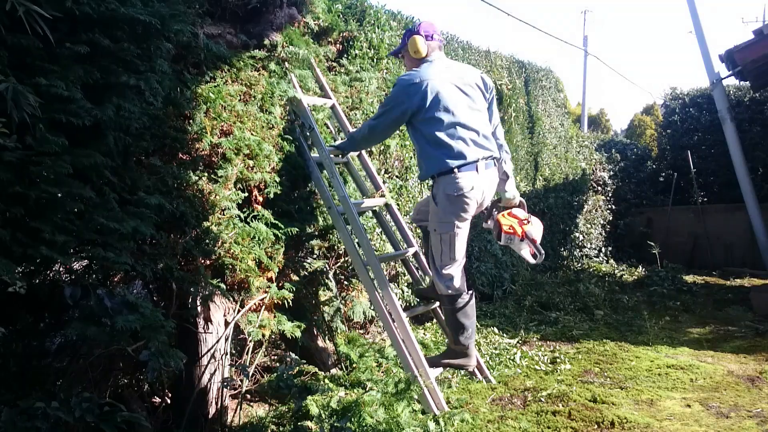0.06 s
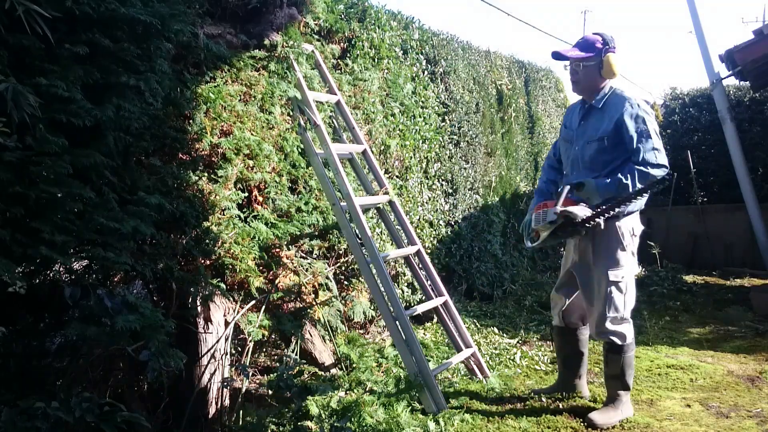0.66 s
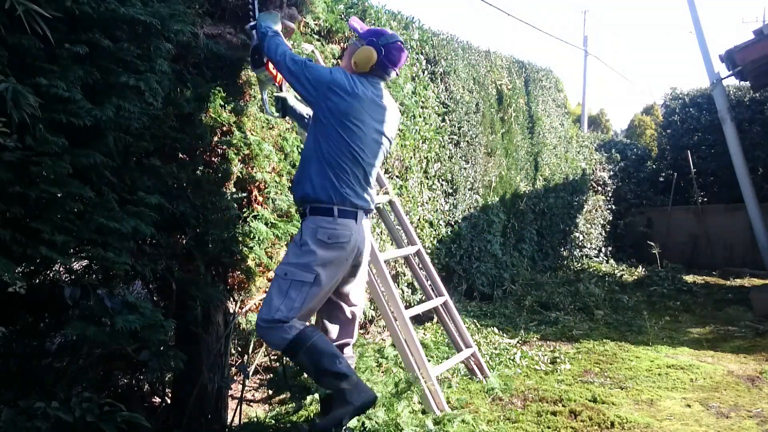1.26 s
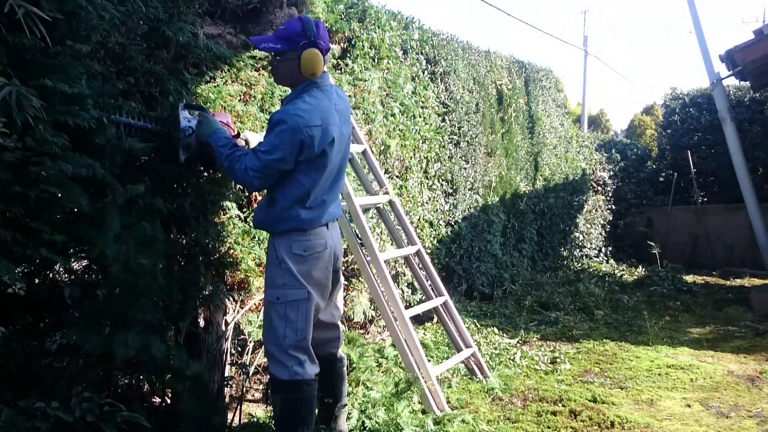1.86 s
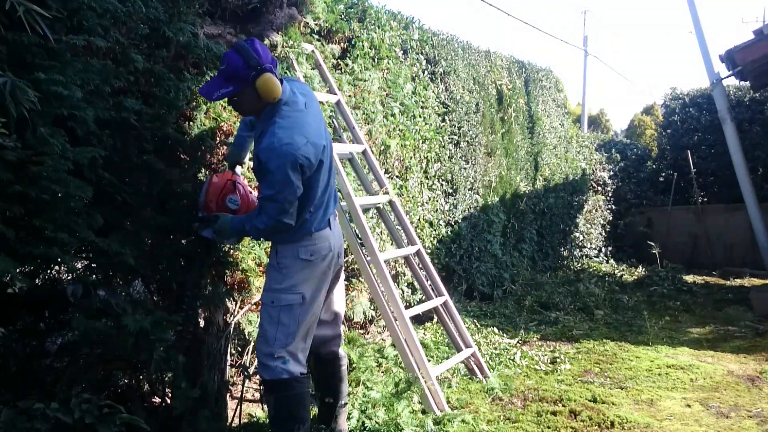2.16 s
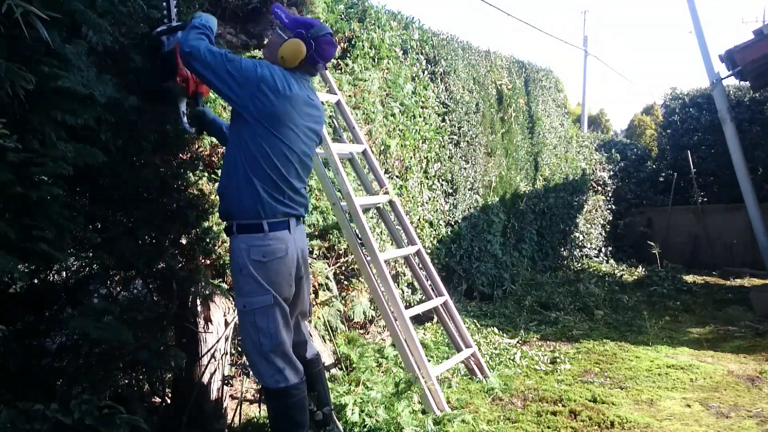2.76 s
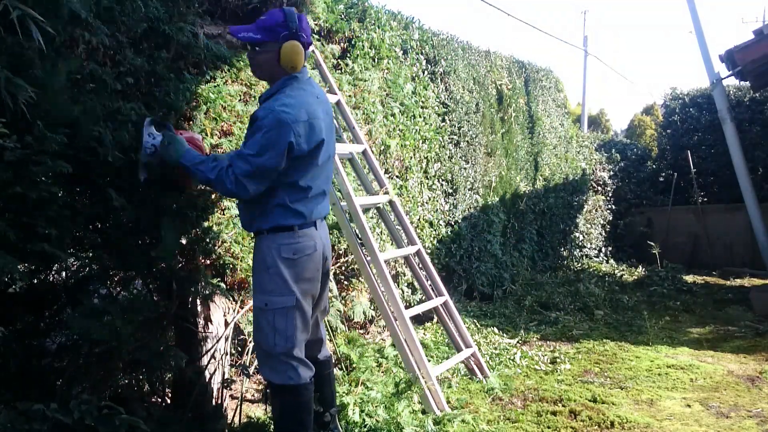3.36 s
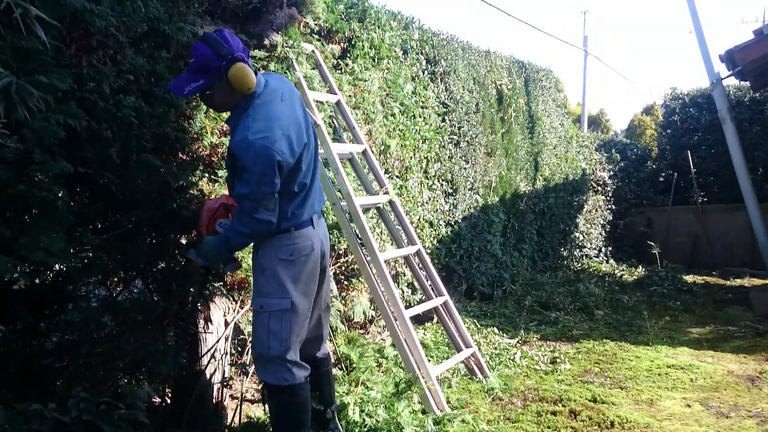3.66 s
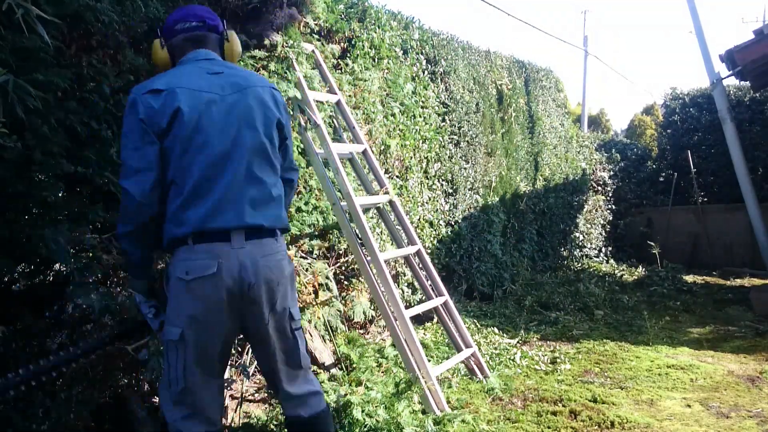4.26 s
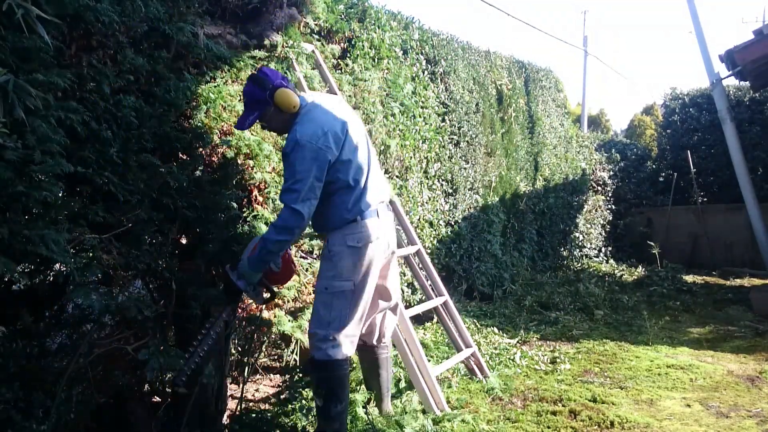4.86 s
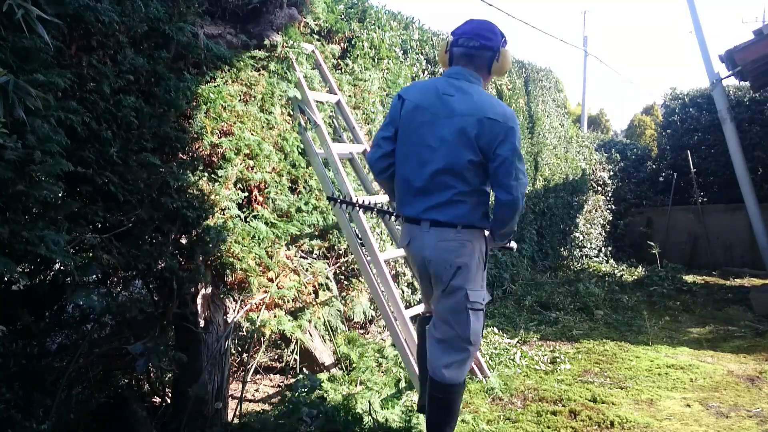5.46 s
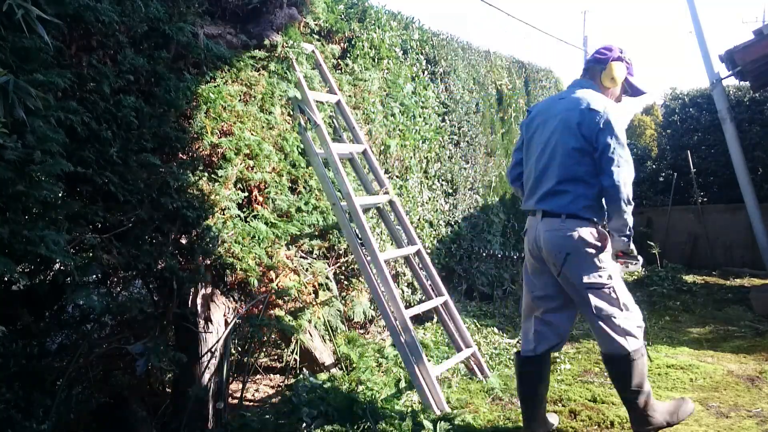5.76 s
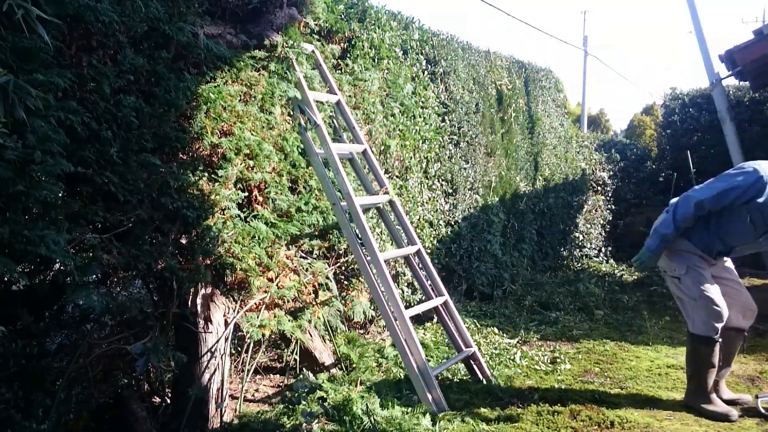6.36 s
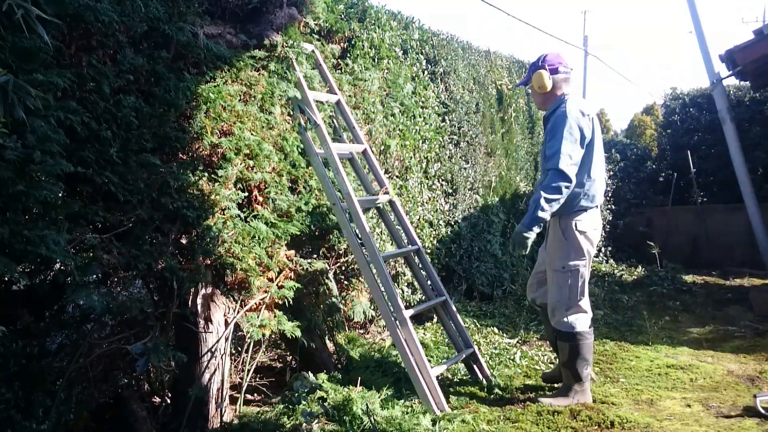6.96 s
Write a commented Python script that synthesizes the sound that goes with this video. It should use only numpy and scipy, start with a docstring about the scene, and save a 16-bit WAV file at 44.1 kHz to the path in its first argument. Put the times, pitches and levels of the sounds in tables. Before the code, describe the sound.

A two-stroke hedge trimmer idles outdoors with a buzzing whine and ticking blades. After a quick blip it revs to full speed for about three seconds, blades hissing and rasping along a hedge. It falls to a lower, clacking idle, revs once more briefly, then idles again, the exhaust puttering more strongly as it is set down. The sound is fairly near, wide and slightly hollow.

```python
"""Two-stroke hedge trimmer

The engine idles, is blipped, revs twice to cut a conifer hedge, and is set down on the lawn.
Its fan whines at three times the firing rate, the blades hiss by friction and rattle by impact,
and exhaust pulses ring the silencer. Two closely spaced microphones of opposite polarity
make the sound wide and hollow."""
import sys
import numpy as np
from scipy import signal
from scipy.fft import rfft, irfft
from scipy.io import wavfile
from scipy.ndimage import map_coordinates

SR = 44100
rng = np.random.default_rng(int(sys.argv[2]) if len(sys.argv) > 2 else 0)


def output_pcm(signal):
    """Save a mono or channel-first signal as 16-bit PCM at the path in sys.argv[1].

    Samples are clipped to [-1, 1] before scaling.
    """
    pcm = np.clip(np.atleast_2d(signal).T, -1, 1) * 32767
    wavfile.write(sys.argv[1], SR, np.round(pcm).astype(np.int16))


N = 313551
TIME = np.arange(N) / SR
HZ = np.maximum(np.arange(N // 2 + 1) * SR / N, 1)

# Speed is stated as whine pitch, and a "turn" is one cycle of the whine. Levels are relative.
# "Lead" is the left channel's phase lead; "pan" is left level minus right level.
# trigger squeezes: (pressed [s], rise time [s], released [s], share of the rise to full speed [0-1])
SQUEEZES = [(0.914, .036, 0.95, 0.21), (1.228, .104, 4.2, 1), (4.708, .118, 5.158, 1)]
# wandering idle speed: (time [s], pitch [Hz])
IDLE_SPEED = [(0, 325), (.15, 333), (.32, 338), (.4, 327), (.52, 335), (.6, 325), (.68, 331), (.9, 331),
              (1.05, 328), (1.16, 330), (1.22, 318), (4.35, 234), (4.57, 227), (4.7, 241.8), (5.3, 240),
              (5.45, 241), (5.62, 240), (5.73, 246), (5.86, 246), (5.98, 259), (6.06, 274), (6.2, 278),
              (6.35, 283), (7.11, 283)]
# idle whine: (harmonic [number], held [dB], grounded [dB], extra pulling up [dB], extra coasting [dB])
IDLE_WHINE = [(1, -41, -49.5, 2, -6), (2, -54.5, -43.5, -3.5, -28), (3, -67, -52, 1, -15),
              (4, -59.5, -47, -17, -11), (5, -61, -71, 4.5, 3)]
# sweep of the bar along the hedge: (time [s], tilt above horizontal [degrees])
BAR_TILT = [(1.36, 80), (1.54, 46), (1.72, 51), (1.88, 22.5), (2.03, 21), (2.13, 3), (2.25, -1), (2.33, 8),
            (2.5, -6.5), (2.6, 8), (2.69, 38), (2.78, 37.5), (2.87, 51), (2.95, 32), (3.04, 46), (3.12, 39),
            (3.3, 33.5), (3.44, 35), (3.52, -19), (3.8, -28), (3.9, -35), (4.05, -44), (4.13, -56.5),
            (5.15, -49)]
# directivity of the whine at full throttle: (tilt [degrees], levels of harmonics 1, 2, 4, 5 [dB])
BEAM_LEVEL = [(-58, -34.5, -29, -28.5, -36.5), (-37.5, -35, -43.5, -30, -26.5), (-11, -44, -30, -26.5, -44),
              (1.5, -40.5, -33, -37, -31), (15.5, -38, -27, -34.5, -28), (38, -39.5, -25, -33, -20.5),
              (44, -36.5, -23.5, -31.5, -29.5), (76, -38, -25.5, -38, -26.5)]
# phase set by reflection off the hedge: (tilt [degrees], leads of harmonics 1, 2, 4, 5 [rad])
BEAM_LEAD = [(-55, 2.7, 2.26, 2.6, 1.4), (-44, 2.58, 2.2, 2.3, 1.4), (-21, 2, 2.9, 2.5, 1.8),
             (-1, 1.75, 2.9, 2.3, 2.3), (14, 1.84, 2.63, 2.5, 2.14), (55, 2.4, 2.55, 1.3, 1.84),
             (82, 2.4, 3.3, 1.5, 2.2)]
# position of the whine at full throttle: (pans of harmonics 1, 2, 4, 5 [dB])
BEAM_PAN = [-0.5, -4, -8.5, -5]
# third harmonic at full throttle: (time [s], level [dB], pan [dB], lead [rad])
THIRD_HARMONIC = [(1.33, -42.6, -6.8, 0), (1.52, -32, -11.3, 0.8), (1.76, -36.5, -12.8, 0),
                  (1.88, -38, -0.6, -2.5), (1.99, -39.8, 7.4, -2.5), (2.13, -30.5, -0.0, -3.5),
                  (2.42, -32, 0, -4), (2.62, -28, -9.1, -3.5), (2.74, -39, 5, -2.1),
                  (2.82, -32.5, -10, 1.2), (2.91, -37, -8.1, 1.3), (3.04, -28.5, -12.4, 1.6),
                  (3.11, -35.4, -1, 0.5), (3.25, -35, -13, -0.0), (3.29, -40.0, 1.7, -2.5),
                  (3.38, -40, 5.7, -1.7), (3.52, -28, -6.4, -4), (3.72, -31.5, -1, -4.5),
                  (3.82, -27, -12, -3.4), (3.95, -35, -2, -3), (4.04, -30.5, -8.5, -3),
                  (4.1, -36, -8, -2.5), (4.16, -32.8, -5.5, -3.1), (4.85, -37.9, -2, -4),
                  (4.93, -32, -15, -2.5), (5.15, -38, 0, -2.5)]
# weak upper whine, which follows the blade rasp: (harmonic [number], level [dB])
OVERTONES = [(6, -24), (7, -15.5), (8, -16), (9, -17), (10, -22), (13, -49)]
# noises against speed: (pitch [Hz], air [dB], buzz [dB], rasp [dB], hiss [dB], rattle [dB], exhaust [dB])
LEVELS_BY_SPEED = [(257, -54, -46, -39.5, -39, -38.5, -56), (284, -49.5, -41.5, -35, -31.5, -67, -56),
                   (315, -49, -43, -33.5, -30, -58, -67), (634, -37.5, -34, -23.5, -20, -33.5, -50.5)]
# noise spectrum under throttle: (frequency [Hz], spectral density [dB])
REVVED_SPECTRUM = [(30.0, -18.5), (110.0, -19), (260.0, -7.5), (360.0, -9), (600.0, -11.5), (900.0, -11.5),
                   (1300.0, -2.5), (1650.0, -6.5), (2400.0, -3.5), (3400.0, -4.5), (5800.0, -6.5),
                   (9000.0, 0), (11000.0, 5.5), (15400.0, 7)]
# noise spectrum at idle: (frequency [Hz], spectral density [dB])
IDLE_SPECTRUM = [(30.0, -3.5), (150.0, -12), (240.0, -6), (470.0, -7.5), (700.0, -10.5), (1150.0, -9.5),
                 (1400.0, -8), (2100.0, -6.5), (3500.0, 2.5), (5000.0, 2), (6000.0, 2), (9500.0, -3),
                 (11500.0, 1.5), (15400.0, 2)]
# blade bar resonances: (frequency [Hz], bandwidth [Hz], gain [dB])
BLADE_MODES = [(2890, 61, 4), (4830, 64, 5), (6240, 240, -13), (7070, 36, 7.5), (11000, 200, -9),
               (11200, 190, -2), (15300, 450, 2.5)]
# resonances of the loose blades and guard: (frequency [Hz], bandwidth [Hz], gain [dB])
GUARD_MODES = [(1455, 110, -4.5), (1860, 200, -6), (2380, 150, 0), (2720, 220, -1.5), (3400, 280, -3),
               (3950, 140, -1.5), (4470, 170, -5), (4950, 160, -5), (6100, 230, -.5), (6980, 200, -1.5)]
# clacks of the slack blades at low speed: (time [s], level [dB])
CLACKS = [(4.4904, -26), (4.5204, -28), (4.575, -27), (4.5884, -27), (4.597, -25), (4.6064, -26),
          (4.6184, -26), (4.6864, -25), (5.7724, -30), (5.8064, -30), (6.6174, -25)]
# jolts as the tool is tipped or jerked: (time [s], level [dB], rise [s], fall [s])
JOLTS = [(.72, -36, 0.18, 0.4), (.93, -35, 0.012, 0.014), (6.05, -35, 0.039, 0.12)]
# resonances of the silencer and its tin shield: (frequency [Hz], bandwidth [Hz], gain [dB])
SILENCER_MODES = [(253, 28, -18), (463, 200, -9), (747, 24, -4.5), (983, 58, 1.5), (1292, 31, 4.5),
                  (1630, 22, 2), (1840, 89, -4.5), (2200, 57, -3.5), (3100, 90, -7.5), (4680, 80, -11)]
# gear case resonances: (frequency [Hz], bandwidth [Hz], gain [dB])
GEAR_MODES = [(1344, 52, 2), (1520, 130, -5), (1997, 93, 3), (2384, 155, 6), (2666, 260, 4.5),
              (3420, 480, -2), (3686, 110, 6), (4300, 110, 1.5)]
# resonances that bark as the engine pulls up: (frequency [Hz], bandwidth [Hz], gain [dB])
BARK_MODES = [(1420, 220, 0), (1870, 420, 6), (2300, 160, -9)]
# knock of the drive on the gear case: (pitch [Hz], level [dB])
KNOCK_BY_SPEED = [(240, -45), (330, -44), (520, -40), (619, -48)]
# the tool faces the listener or is screened by the gardener: (time [s], level [dB])
EXPOSURE = [(0, -2), (.25, -1), (.43, -2), (.65, 2.5), (.88, 2), (1.05, 0.5), (1.35, 0), (1.6, 1),
            (2.4, 0.15), (3.0, .5), (3.75, 0.5), (3.88, 1), (3.94, -2.5), (4.04, -3), (4.12, 2.5),
            (4.23, 1.5), (4.47, -2.5), (5.1, 0.7), (5.36, -0.5), (5.6, -1.5), (5.97, -0.5), (6.13, 0.5),
            (7.11, -0.5)]
# swing of the tool across the microphones: (time [s], pan [dB])
TOOL_SWING = [(0, -2.5), (.8, -1.6), (1.25, -2.5), (1.75, -1.5), (2.25, -0.5), (2.75, -2), (3.25, -2.5),
              (3.75, -0.3), (4.25, 0.5), (4.8, -0.5), (5.7, -2.5), (6.3, -1.7), (7.11, -0.5)]
# further swing of the bar: (time [s], pan [dB])
BAR_SWING = [(0, -1), (.7, 0.5), (1.1, 3), (1.45, 0), (1.75, 1), (2.2, -1), (3.2, 0.5), (4.2, -2.5),
             (5.5, 1), (7.11, 0)]
# close reflection as the tool is carried and lowered: (time [s], lowest notch [Hz], strength [0-1])
CLOSE_REFLECTION = [(5.45, 1100, 0), (5.6, 1250, .35), (5.75, 1580, .7), (5.87, 1690, .8), (5.98, 1900, .8),
                    (6.06, 2130, .7), (6.2, 2300, 0)]
# response of the microphone pair: (frequency [Hz], coherence [0-1], lead [rad], pan [dB])
MIC_PAIR = [(40, 0, 6.9, -3), (130, 0.23, 4.1, -6), (257, 0.74, 2.77, 1.2), (633, 0.28, 2.56, -2.5),
            (1160, 0.51, 2.27, -4.5), (2600, 0.49, 2.56, -6), (4360, 0.3, 1.52, -6), (7000, 0.4, 1.15, -7),
            (11600, 0, 2, -0.5), (16000, 0.34, .5, -4)]

FULL_SPEED_HZ, SURGE_HZ_PER_S = 615.2, 1300
TURNS_PER_FIRING, TURNS_PER_STROKE = 3, 6.8
LOAD_SHARE = 0.73   # how far the whine follows load rather than speed
# turning from the hedge uncovers part of the exhaust side; setting the tool down uncovers the rest
TURN_AWAY_S, TURN_TAKES_S, TURN_SHARE = 5.4, 0.34, 0.38
SET_DOWN_S, SET_DOWN_TAKES_S = 6.136, 0.37


def fan_whine(turns, pitch, throttle, effort, levels_db, rasp_db):
    """Modulation: each blade stroke loads the engine and puts sidebands round the fan's harmonics."""
    stroke = 2 * np.pi * turns / TURNS_PER_STROKE + 0.53 * drift(11.0)
    loaded_turns = turns + 0.0053 * np.sin(stroke)
    whine = 0
    for k, (db, (_, lead, pan_db)) in enumerate(zip(levels_db, directivity()), 1):
        tone = harmonic(loaded_turns, k, pitch, flutter_db=.2 * k, wander_rad=0.13 * (k - .7),
                        rough_rad=.048 * k, beamed=throttle, beam_lead=lead, beam_pan_db=pan_db)
        whine += from_db(db) * tone
    # the overtones sing out at full throttle, most with the bar raised
    sing_db = (2.05 + 0.018 * in_time(BAR_TILT)[0]) * throttle ** 3
    for k, db in OVERTONES:
        tone = harmonic(loaded_turns, k, pitch, flutter_db=4.0, wander_rad=0.56, rough_rad=0.58)
        whine += effort ** 2 * from_db(rasp_db + db - 3 + sing_db) * tone
    return whine * (1 + 0.17 * np.cos(stroke))


def harmonic(turns, k, pitch, flutter_db, wander_rad, rough_rad, beamed=0., beam_lead=0., beam_pan_db=0.):
    """Phase noise: turbulence roughens harmonic k, and shifting reflections vary its lead."""
    _, lead, pan_db = in_frequency(MIC_PAIR, k * pitch)
    phase = 2 * np.pi * (k * turns + rng.random()) + rough_rad * drift(130)
    left = np.sin(phase + lead + beamed * (beam_lead - lead) + wander_rad * drift(5.9))
    gains = balance(pan_db + beamed * (beam_pan_db - pan_db))
    return np.sqrt(2) * gains * np.array([left, np.sin(phase)]) * from_db(flutter_db * drift(12.6))


def whine_levels(effort, surge, grounded, exposure_db):
    """Radiation follows load: effort moves harmonics 1-5 from their idle to their beamed levels."""
    for (k, held_db, ground_db, pull_db, coast_db), (beam_db, _, _) in zip(IDLE_WHINE, directivity()):
        screening = 2.2 if k == 1 else 1   # exposure sways the fundamental most
        idle_db = held_db + grounded * (ground_db - held_db) + screening * exposure_db
        surge_db = np.interp(surge, [-1, 0, 1], [coast_db, 0, pull_db])
        yield (1 - effort) * idle_db + effort * beam_db + surge_db


def directivity():
    """Directional radiation: level, lead and pan of harmonics 1-5 as the bar moves at full throttle."""
    tilt = in_time(BAR_TILT)[0]
    first, second, fourth, fifth = zip(curves(BEAM_LEVEL, tilt), curves(BEAM_LEAD, tilt), BEAM_PAN)
    third_db, third_pan_db, third_lead = in_time(THIRD_HARMONIC)
    return first, second, (third_db, third_lead, third_pan_db), fourth, fifth


def trigger_response(fall_s):
    """Inertia: the engine picks up quickly, holds, and runs down after release (0-1)."""
    response = 0
    for pressed_s, rise_s, released_s, share in SQUEEZES:
        run_down = np.exp(-(np.maximum(TIME - released_s, 0) / fall_s) ** 1.5)
        response += share * ease((TIME - pressed_s) / rise_s) * run_down
    return response


def acceleration(speed, settle_s):
    """First-order lag on the change of speed: from -1 coasting down to 1 pulling up."""
    pole = np.exp(-1 / (settle_s * SR))
    return signal.lfilter([1 - pole], [1, -pole], np.tanh(np.gradient(speed) * SR / SURGE_HZ_PER_S))


def tooth_friction(turns, throttle):
    """Sliding friction: the envelope of teeth passing in surges, grainy with twigs, looser at idle."""
    surges = 0.043 * np.cos(2 * np.pi * turns) + 0.035 * np.cos(2 * np.pi * turns / TURNS_PER_FIRING)
    grain_db = (1.0 - 0.17 * throttle) * drift(900) + 0.69 * drift(23)
    return (1 + surges * (1 - .7 * throttle)) * from_db(grain_db)


def rush(throttle, envelope, low_hz, high_hz, level_db, ring=0.):
    """One modulated band of noise, from faint low rumble to high hiss, coloured by the throttle."""
    noise = rng.standard_normal((2, N)) * envelope
    spectrum = rfft(noise + ring * resonate(noise, BLADE_MODES))
    band = 1 / np.sqrt((1 + (low_hz / HZ) ** 14) * (1 + (HZ / high_hz) ** 14))
    idle, revved = (rms_one(irfft(spectrum * band * from_db(in_frequency(colour, HZ)[0]), N))
                    for colour in (IDLE_SPECTRUM, REVVED_SPECTRUM))
    return from_db(level_db) * (idle + throttle * (revved - idle))


def blade_rattle(pitch, level_db, knocks_per_turn, decay_s):
    """Random impacts ring the loose blades and guard, more often at speed and harder when jolted."""
    sizes = from_db(5 * rng.uniform(-1, 1, N))
    knocks = (rng.random(N) < knocks_per_turn * pitch / SR) * sizes
    ring = rms_one(resonate(bursts(knocks, decay_s), GUARD_MODES))
    return ring * np.hypot(from_db(level_db), jolting())


def jolting():
    """Transient excitation: each jolt of the tool is a lopsided Gaussian swell."""
    return sum(from_db(db) * np.exp(-((TIME - s) / np.where(TIME < s, rise_s, fall_s)) ** 2)
               for s, db, rise_s, fall_s in JOLTS)


def blade_clacks(decay_s, gain_db):
    """Impact excitation: short gritty knocks ring the modes of the bar."""
    hits = np.zeros(N)
    for s, db in CLACKS:
        hits[int(s * SR)] = from_db(db + gain_db)
    grit = bursts(hits, decay_s)
    return resonate(grit, BLADE_MODES) + 0.16 * np.diff(grit, prepend=0)


def blade_ticking(turns, level_db):
    """Forced vibration: the drive taps the bar once a turn and keeps it ringing."""
    taps = once_a_turn(turns, uneven_db=8, jitter_s=.00003)
    return rms_one(resonate(taps, BLADE_MODES)) * from_db(level_db)


def exhaust(turns, level_db, late_share=.12, gas_noise=0.05):
    """Source and filter: each firing, at times a turn late, rings the silencer amid weaker knocks."""
    beats = np.flatnonzero(np.diff(np.floor(turns)))
    firings = np.cumsum(TURNS_PER_FIRING + (rng.random(len(beats)) < late_share))
    firings = firings[firings < len(beats)]
    puffs = np.zeros(N)
    puffs[beats[firings]] = from_db(rng.uniform(-4, 2, len(firings)))
    puffs += .18 * once_a_turn(turns, uneven_db=2, jitter_s=.00008)
    puffs += gas_noise * bursts(puffs, decay_s=0.0013)[0]
    return rms_one(side_branch(resonate(puffs, SILENCER_MODES))) * from_db(level_db)


def side_branch(sound, notch_hz=1440, width_hz=170):
    """Side-branch resonance: a closed chamber of the silencer removes one narrow band."""
    return signal.lfilter(*signal.iirnotch(notch_hz, notch_hz / width_hz, fs=SR), sound)


def gear_backlash(turns, surge, level_db, grit, coast_db=9, pull_db=15.5):
    """Backlash: the drive slaps the gear case, ringing at idle, barking up and snarling down."""
    jitter_s = .00001 + .000035 * np.maximum(-surge, 0)   # unloaded, the slaps fall out of step
    slaps = once_a_turn(turns, uneven_db=1.5, jitter_s=jitter_s)
    slaps += grit * bursts(slaps, decay_s=0.0005)[0]
    gain = from_db(level_db + np.interp(surge, [-1, 0, 1], [coast_db, 0, pull_db]))
    ring = rms_one(resonate(slaps, GEAR_MODES)) * np.hypot(gain, from_db(1) * jolting())
    bark = rms_one(resonate(slaps, BARK_MODES)) * from_db(-36.5) * np.maximum(surge, 0)
    direct = ring + bark
    hedge_echo = np.interp(TIME - .0047, TIME, direct)
    return np.array([direct, hedge_echo])


def casing_buzz(turns, throttle, level_db):
    """Amplitude modulation: the casing's noise pulses once a turn."""
    pulsing = 1 + 0.5 * np.cos(2 * np.pi * turns) + 0.069 * np.cos(4 * np.pi * turns)
    return rush(throttle, pulsing, 770, 2450, level_db)


def lawn_bounce(sound, delay_s=.0015, wander_s=.00007, strength=.27):
    """Ground interference: a reflection of changing path makes shifting peaks and hollows."""
    emitted_s = TIME - delay_s - wander_s * drift(1.64)
    bounced = np.array([map_coordinates(s, [emitted_s * SR], order=3, mode="nearest") for s in sound])
    return (sound + strength * bounced) / np.hypot(1, strength)


def hollowed(sound, top_hz=4500):
    """Comb filtering: a close reflection cuts odd multiples of a pitch that rises as the path shortens."""
    notch_hz, strength = in_time(CLOSE_REFLECTION)
    dull = irfft(rfft(sound) / (1 + (HZ / top_hz) ** 2), N)
    bounced = np.array([np.interp(TIME - .5 / notch_hz, TIME, s) for s in dull])
    return (sound + strength * bounced) / np.hypot(1, .5 * strength)


def microphones(direct, scattered):
    """Partial coherence: the left side mixes almost inverted direct sound with scatter from the hedge."""
    coherence, lead, pan_db = in_frequency(MIC_PAIR, HZ)
    right = rfft(direct)
    left = coherence * np.exp(1j * lead) * right + np.sqrt(1 - coherence ** 2) * rfft(scattered)
    return irfft(np.array([left, right]) * balance(pan_db), N)


def line_of_sight(sound):
    """Direct propagation: a compact source reaches both microphones without scatter."""
    _, lead, pan_db = in_frequency(MIC_PAIR, HZ)
    return irfft(rfft(sound) * balance(pan_db) * np.exp(1j * np.array([lead, 0 * lead])), N)


def once_a_turn(turns, uneven_db, jitter_s):
    """Impulse train: one click a turn, uneven in strength and timing."""
    beats = np.flatnonzero(np.diff(np.floor(turns)))
    timing, strength = np.clip(rng.standard_normal((len(beats), 2)), -2, 2).T
    shifts = (np.broadcast_to(jitter_s, N)[beats] * SR * timing).astype(int)
    clicks = np.zeros(N)
    clicks[np.clip(beats + shifts, 0, N - 1)] = from_db(uneven_db * strength)
    return clicks


def bursts(clicks, decay_s):
    """Exponential decay: each click becomes a noise burst, direct and scattered."""
    envelope = signal.lfilter([1], [1, -np.exp(-1 / (decay_s * SR))], clicks + 1e-18)
    return envelope * rng.standard_normal((2, N))


def resonate(force, modes):
    """Modal superposition: parallel damped resonances of alternating sign."""
    total = 0
    for k, (hz, width_hz, db) in enumerate(modes):
        radius = np.exp(-np.pi * width_hz / SR)
        poles = [1, -2 * radius * np.cos(2 * np.pi * hz / SR), radius ** 2]
        mode = (1 - radius ** 2) / 2 * signal.lfilter([1, 0, -1], poles, force + 1e-18)
        total += (-1) ** k * from_db(db) * mode
    return total


def drift(rate_hz):
    """Random fluctuation: low-passed noise of unit rms."""
    return rms_one(irfft(rfft(rng.standard_normal(N)) / (1 + (HZ / rate_hz) ** 4), N))


def balance(pan_db):
    """Constant-power panning: left and right gains."""
    left = from_db(pan_db)
    return np.array([left, np.ones_like(left)]) / np.sqrt((1 + left ** 2) / 2)


def curves(rows, at):
    """Linear interpolation of each later column against the first."""
    points, *columns = np.transpose(rows)
    return [np.interp(at, points, column) for column in columns]


def in_time(rows):
    """Interpolation of each column at every sample."""
    return curves(rows, TIME)


def in_frequency(rows, hz):
    """Interpolation of each column on a log-frequency axis."""
    points, *columns = np.transpose(rows)
    return [np.interp(np.log(hz), np.log(points), column) for column in columns]


def ease(x):
    """Raised-cosine step from 0 to 1."""
    return np.sin(np.pi / 2 * np.clip(x, 0, 1)) ** 2


def from_db(db):
    """Amplitude ratio of a level in decibels."""
    return 10 ** (np.asarray(db) / 20)


def rms_one(x):
    """Normalisation to unit rms."""
    return x / np.sqrt(np.mean(x ** 2) + 1e-20)


def scene():
    """Superposition: the trigger sets engine speed, which drives the fan, blades, exhaust and gears."""
    idle = in_time(IDLE_SPEED)[0]
    speed = idle + (FULL_SPEED_HZ - idle) * trigger_response(fall_s=.14)
    throttle = np.clip((speed - 330) / 270, 0, 1)
    pitch = speed * (1 + .0026 * drift(16) + .004 * (1 - throttle) * drift(9))
    turns = np.cumsum(pitch) / SR
    load = trigger_response(fall_s=0.061)   # combustion dies away sooner than speed
    effort = throttle + LOAD_SHARE * (load - throttle)
    surge = acceleration(speed, settle_s=0.011)
    grounded = TURN_SHARE * ease((TIME - TURN_AWAY_S) / TURN_TAKES_S)
    grounded += (1 - TURN_SHARE) * ease((TIME - SET_DOWN_S) / SET_DOWN_TAKES_S)
    exposure_db = in_time(EXPOSURE)[0]
    levels_db = in_frequency(LEVELS_BY_SPEED, speed) + exposure_db
    air_db, buzz_db, rasp_db, hiss_db, rattle_db, exhaust_db = levels_db
    knock_db = in_frequency(KNOCK_BY_SPEED, speed)[0] + exposure_db

    teeth = tooth_friction(turns, throttle)
    rumble = rush(throttle, from_db(drift(10)), 2.1, 151, hiss_db - 31.5 + 1.3 * throttle)
    cooling_air = rush(throttle, from_db(1.7 * drift(32)), 153, 1015, air_db - 2)
    casing = casing_buzz(turns, throttle, buzz_db - 3.5 + 2 * grounded)
    rasp = rush(throttle, teeth, 2320, 7980, rasp_db - 2 + throttle - 2.5 * grounded, ring=0.013)
    hiss = rush(throttle, teeth, 8540, 16400, hiss_db + 0.42 - 4.5 * grounded, ring=0.12)
    rattle = blade_rattle(pitch, rattle_db + 1.5 * grounded, knocks_per_turn=4.4, decay_s=0.00025)
    clacks = blade_clacks(decay_s=0.00079, gain_db=10)
    gears = gear_backlash(turns, surge, knock_db - 8 * grounded, grit=0.027)
    putter = exhaust(turns, exhaust_db + 23.3 * grounded)
    ticks = blade_ticking(turns, rasp_db - 8 - 13 * throttle)

    body = microphones(*(rumble + cooling_air + hiss + hollowed(casing + gears)))
    bar = microphones(*hollowed(lawn_bounce(rasp + rattle + clacks))) * balance(in_time(BAR_SWING)[0])
    compact = hollowed(line_of_sight(putter + ticks))
    whine_db = whine_levels(effort, surge, grounded, exposure_db)
    fan = fan_whine(turns, pitch, throttle, effort, whine_db, rasp_db)
    return (fan + bar + compact + body) * balance(in_time(TOOL_SWING)[0])


def record(dry):
    """Band limiting: a steep low-pass removes the highest treble."""
    cutoff_hz = 15750
    return irfft(rfft(dry) / np.sqrt(1 + (HZ / cutoff_hz) ** 400), N)


dry = scene()
out = record(dry)
output_pcm(out)
```